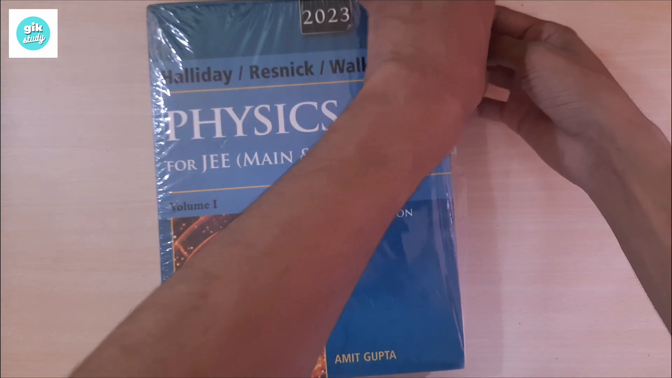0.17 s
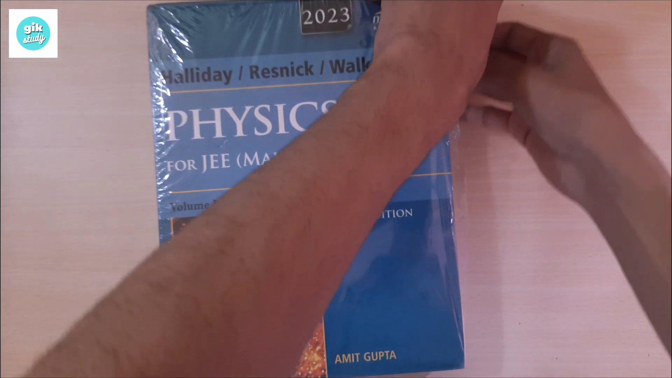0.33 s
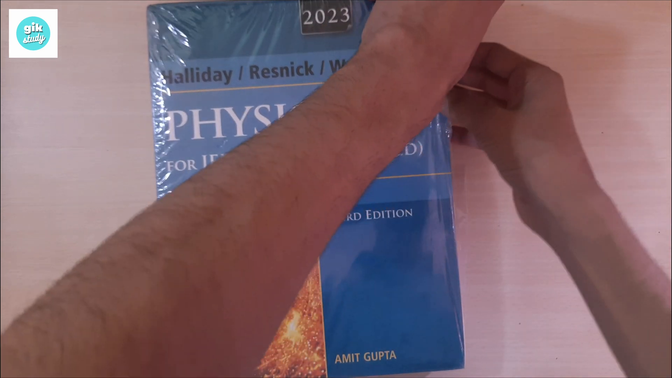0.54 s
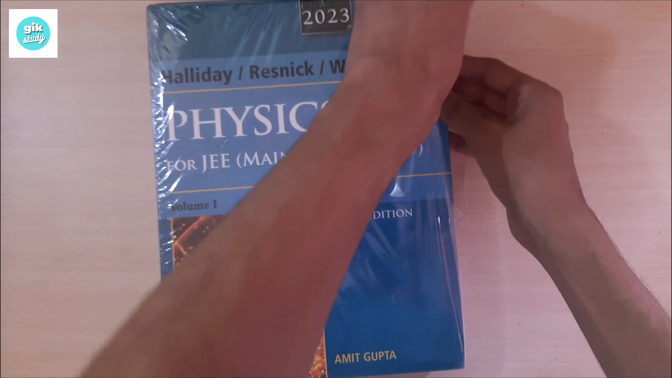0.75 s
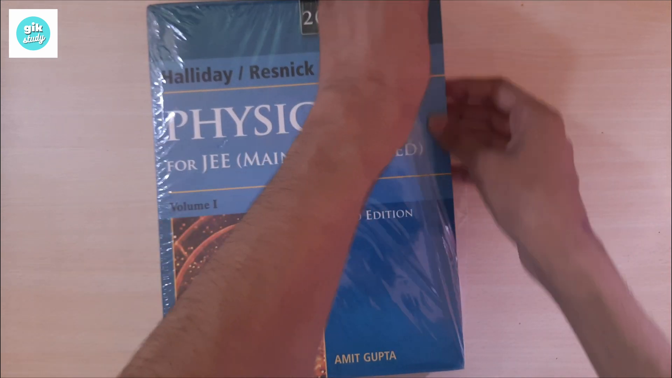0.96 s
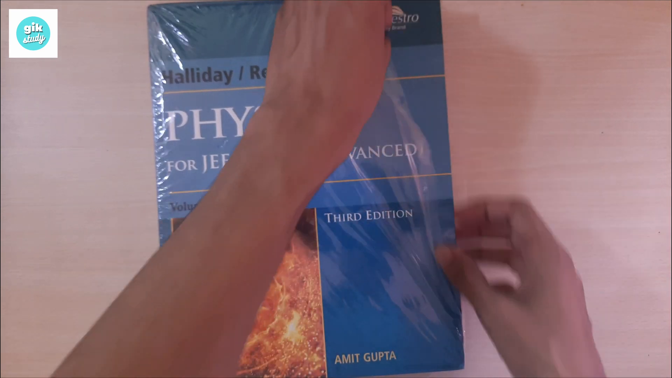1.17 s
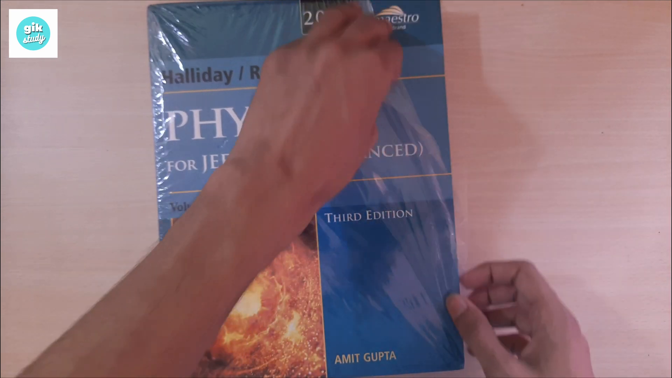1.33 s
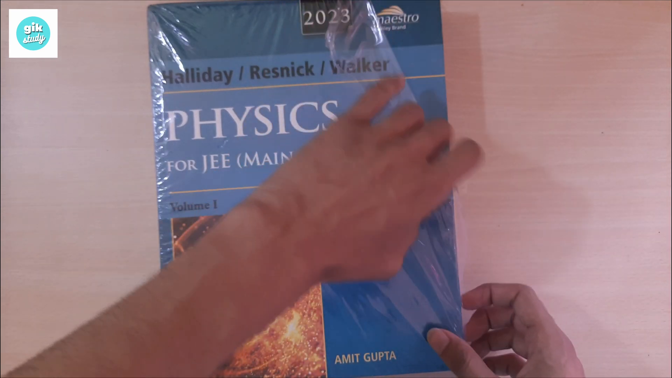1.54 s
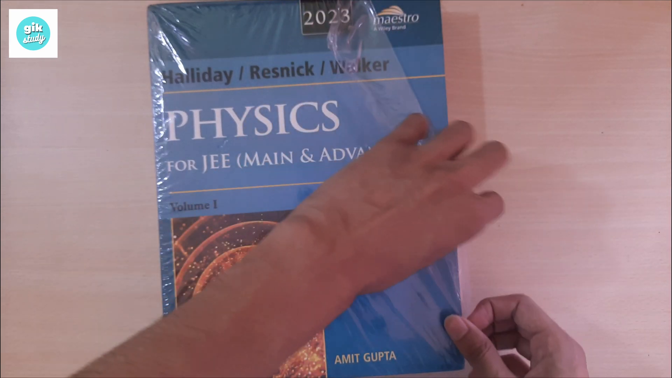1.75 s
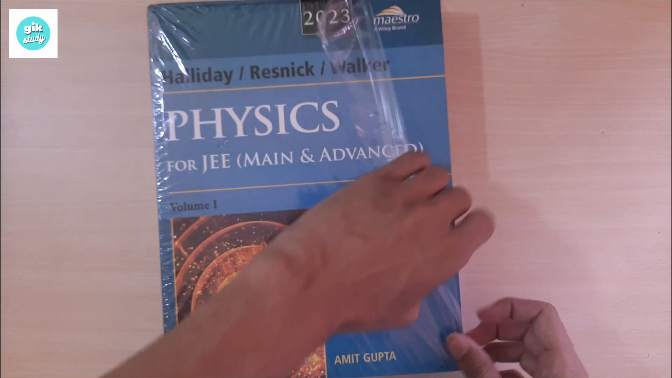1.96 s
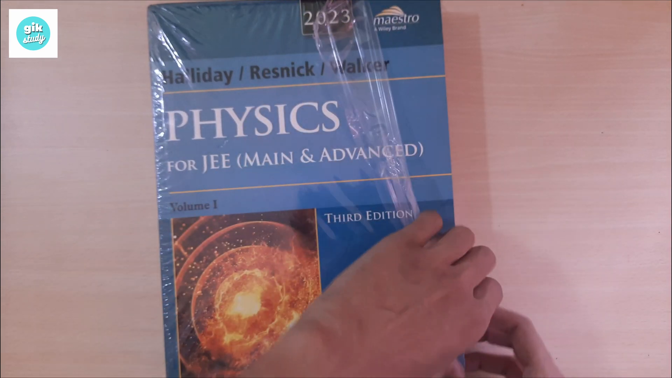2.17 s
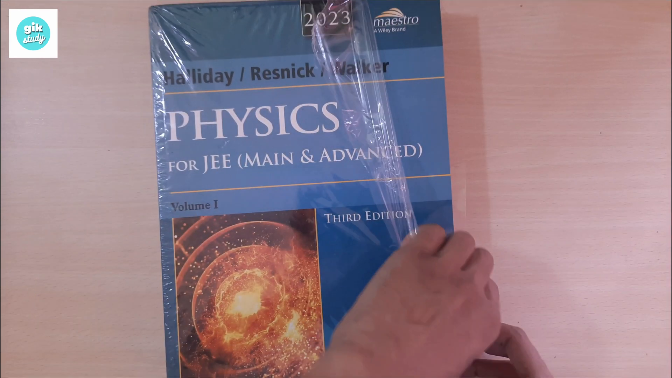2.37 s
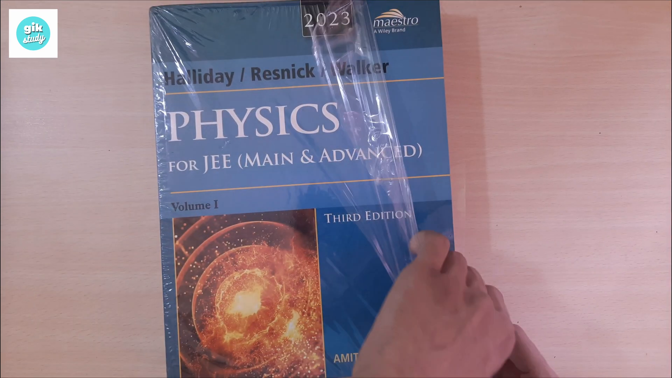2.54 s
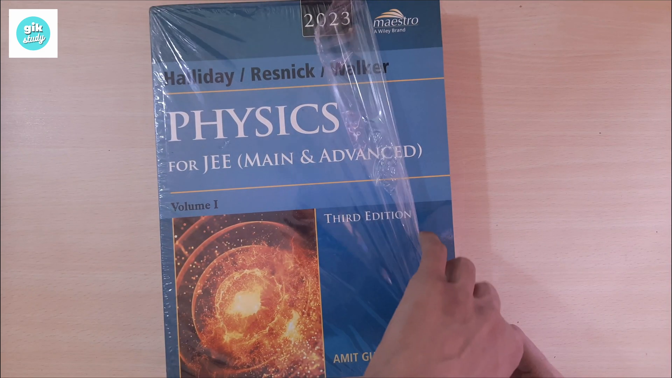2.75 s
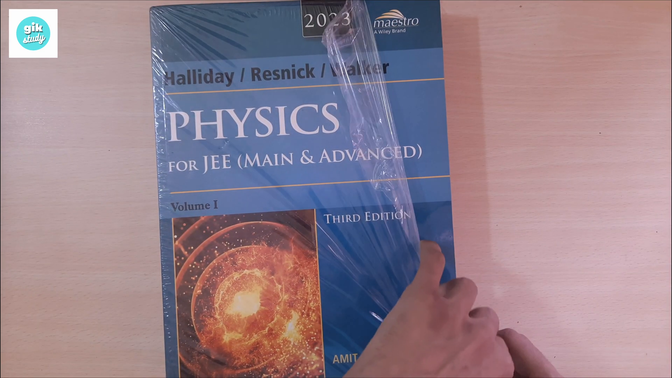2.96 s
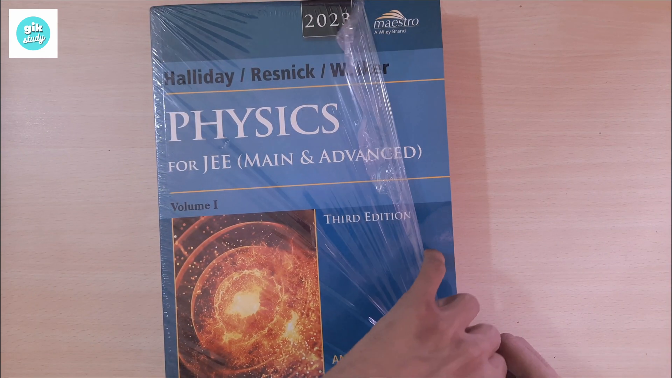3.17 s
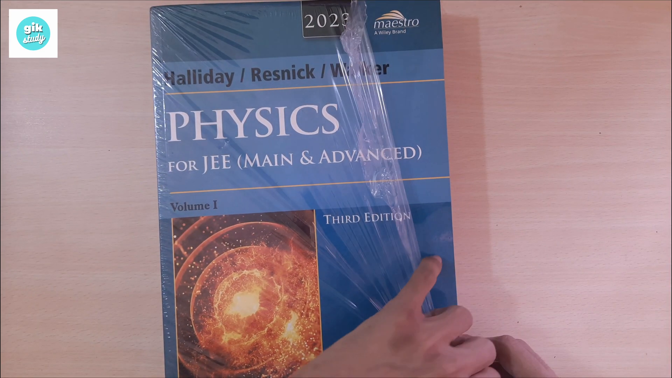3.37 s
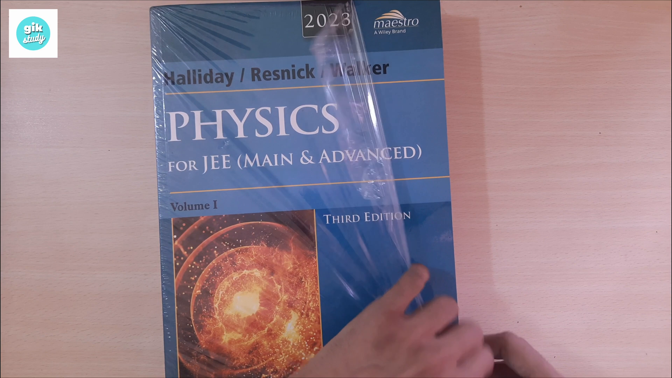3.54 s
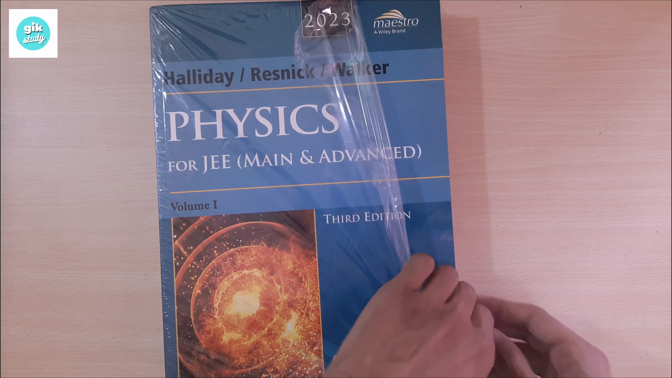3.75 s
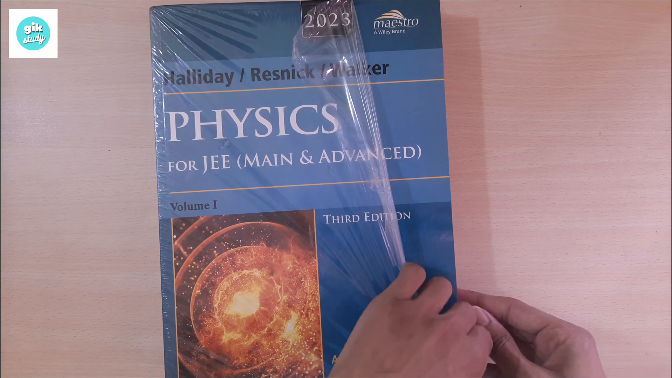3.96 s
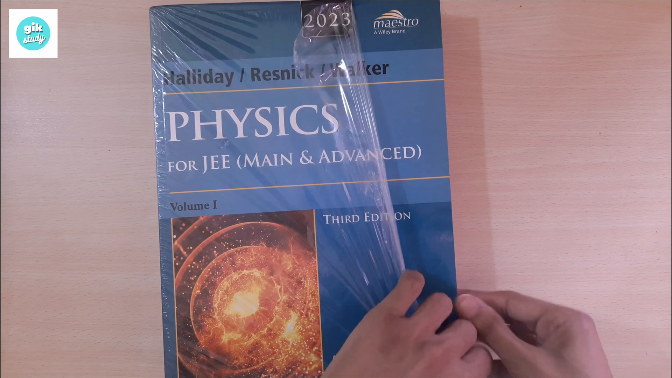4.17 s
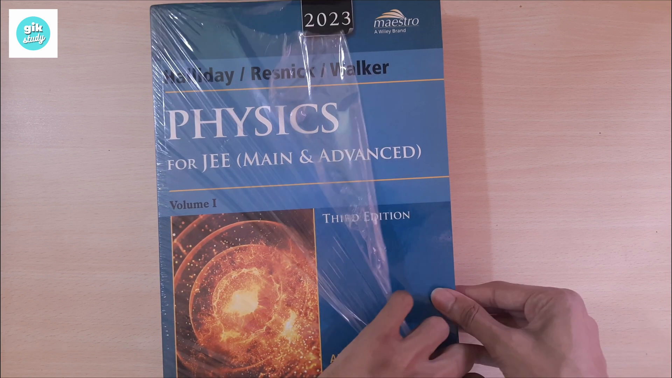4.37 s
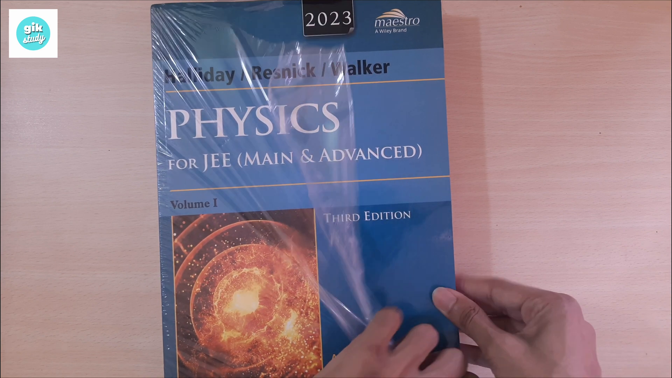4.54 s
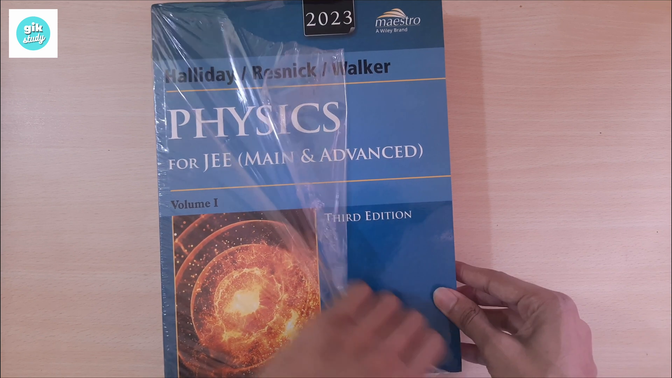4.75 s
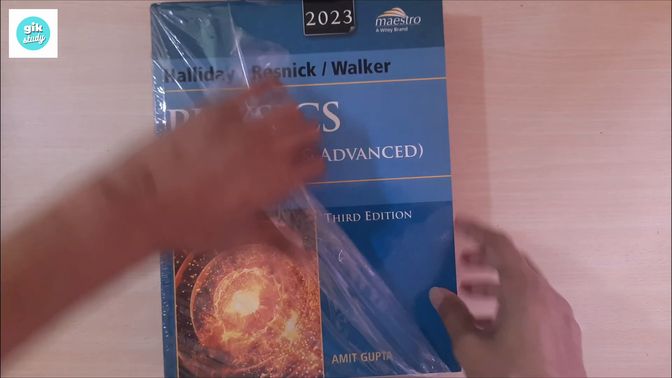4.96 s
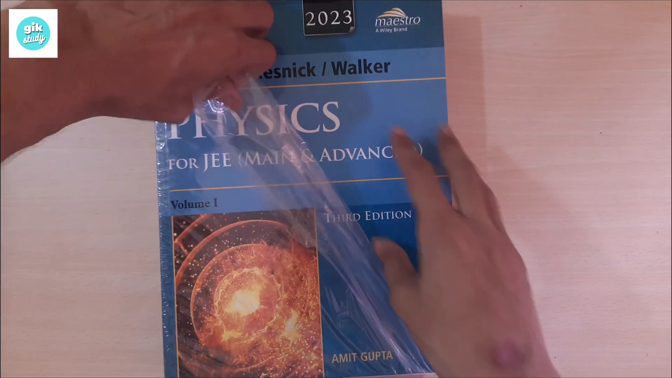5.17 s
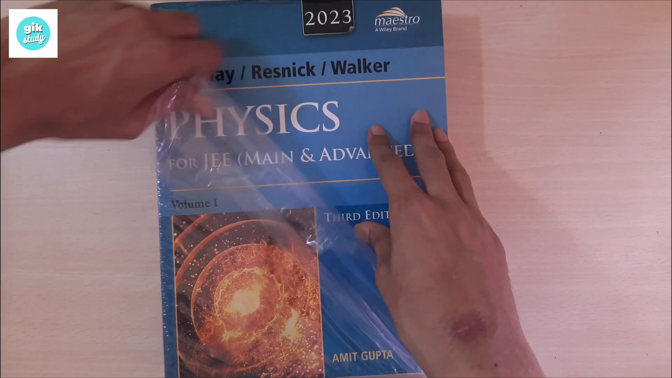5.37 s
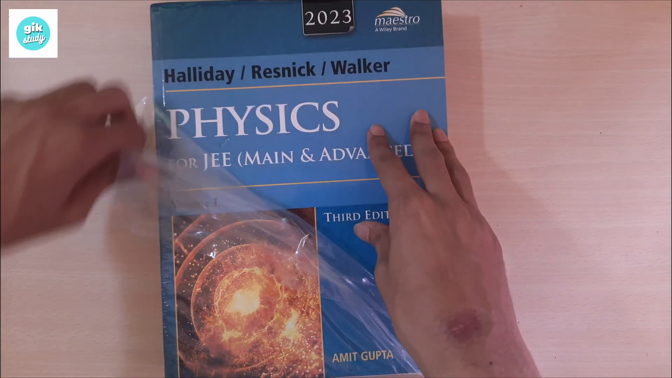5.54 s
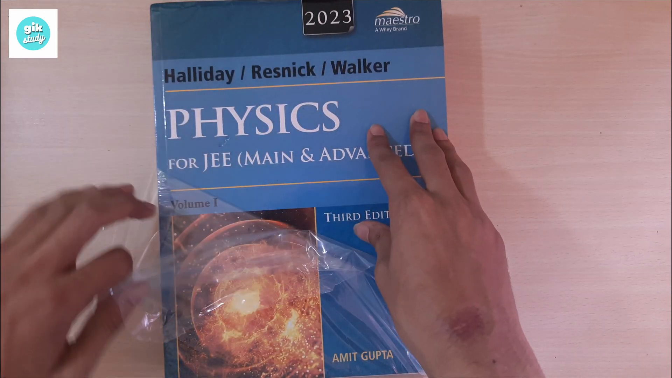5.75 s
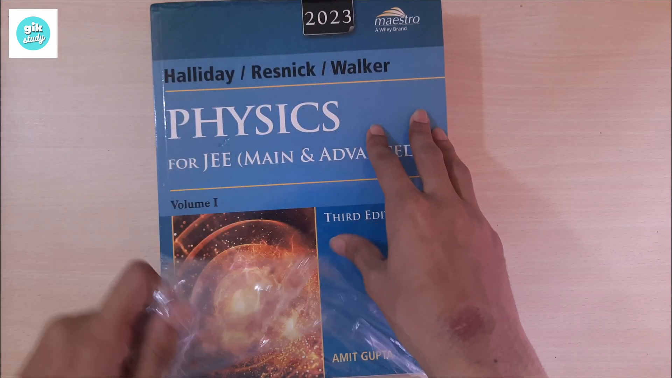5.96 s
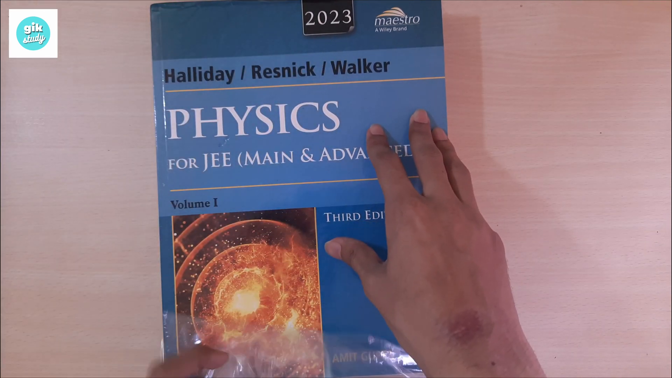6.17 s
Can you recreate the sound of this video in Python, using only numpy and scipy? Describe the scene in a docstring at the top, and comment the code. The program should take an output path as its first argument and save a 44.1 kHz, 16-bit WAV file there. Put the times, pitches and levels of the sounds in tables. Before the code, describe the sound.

Thin plastic film crackles and tears under hands close by, snaps loudly once when stretched taut, then rustles and billows loosely in a small room.

```python
"""Peeling shrink wrap off a book

Film is pulled off a book in a small bare room, close to a stereo microphone, with faint birds outside.
Clouds of tiny creases ring damped patches of film, single folds snap, and the loose sheet thrums.
Stretched taut, the film bursts with one loud crack made of short ringing modes. Tears are avalanches
of clicks. The path to the right microphone grows as the film is dragged off to the left."""
import sys
import numpy as np
from scipy import signal
from scipy.io import wavfile
from scipy.ndimage import uniform_filter1d, map_coordinates

SR = 44100
rng = np.random.default_rng(int(sys.argv[2]) if len(sys.argv) > 2 else 0)


def digitize_waveform(pressure):
    """Quantize a signal to 16-bit integers and store it at the path in sys.argv[1].

    Rows of a 2-D input are taken as channels; values are limited to [-1, 1].
    """
    field = np.atleast_2d(pressure).T
    bounded = np.clip(field, -1, 1)
    quanta = np.round(bounded * 32767).astype(np.int16)
    wavfile.write(sys.argv[1], SR, quanta)


N = 273816
TIME = np.arange(N) / SR


def amp(db):
    """Turns decibels into a gain."""
    return 10 ** (np.asarray(db) / 20)


def evened(x):
    """Scales a sound to an rms of 1."""
    return x / np.sqrt(np.mean(x ** 2) + 1e-20)


def read(points, hz):
    """Reads a spectrum between its points, on a log-frequency axis."""
    f, value = np.transpose(points)
    return np.interp(np.log(hz + 1), np.log(f + 1), value)


def curve(points):
    """Joins (t/s, value) points by straight lines."""
    return np.interp(TIME, *np.transpose(points))


def add(mix, s, sound):
    """Mixes a sound in at time s, leaving out what falls outside the scene."""
    start = round(s * SR)
    part = mix[:, max(start, 0):max(start + sound.shape[-1], 0)]
    part += sound[..., max(-start, 0):][..., :part.shape[-1]]


def sides(db):
    """Gains of the two channels for a left-right difference."""
    return amp([[db / 2], [-db / 2]])


def coloured(x, points, size=2048):
    """Causal filter with the given spectrum, so that attacks stay sharp."""
    log_gain = np.log(amp(read(points, abs(np.fft.fftfreq(size, 1 / SR)))))
    minimum_phase = np.exp(np.conj(signal.hilbert(log_gain)))
    taps = np.fft.ifft(minimum_phase).real
    return signal.oaconvolve(x, taps[None], axes=1)[:, :x.shape[1]]


def ring(x, hz, q):
    """A patch that rings: one damped resonance, sharper for a larger q."""
    return signal.lfilter(*signal.iirpeak(min(hz, SR / 3), max(q, hz / SR * 5), SR), x)


# colour of the still air: f/Hz, level/dB (per Hz)
FLOOR = [(30, -30), (270, -5.5), (600, -15.5), (1330, -21), (7080, -19.5), (9190, -30.5), (15500, -40)]
FLOOR_DB = -69


def background(hum_hz=468, hum_db=-77, hum_end_s=1.7):
    """Still air in the room is coloured noise; a faint far hum is noise in a narrow band that fades away."""
    air = evened(coloured(rng.standard_normal(N) + 1.6 * rng.standard_normal((2, N)), FLOOR))
    hum = evened(ring(ring(rng.standard_normal(N), hum_hz, 50), hum_hz, 50))
    fade = np.clip((hum_end_s - TIME) / .5, 0, 1)
    return amp(FLOOR_DB) * air + amp(hum_db) * hum * fade


# bird whistles: start t/s, length/s, first f/Hz, middle f/Hz, last f/Hz, relative level/dB
BIRDS = [(-.06, .24, 7650, 7300, 6650, -62), (.41, .25, 1400, 1565, 1530, -64),
         (2.27, .25, 1480, 1570, 1530, -56), (2.63, .2, 7450, 7300, 6750, -56)]


def birds(waver_hz=28, flutter_db=4.5):
    """Thin far whistles, some high and falling, some low and arched, waver in pitch and strength."""
    out = np.zeros((2, N))
    for s, length, first, middle, last, db in BIRDS:
        u = np.linspace(0, 1, round(length * SR))  # progress through the whistle
        hz = np.polyval(np.polyfit([0, .5, 1], [first, middle, last], 2), u)
        hz = hz + waver_hz * evened(uniform_filter1d(rng.standard_normal(len(u)), size=400))
        flutter = np.interp(u, np.linspace(0, 1, 20), np.tanh(2 * rng.standard_normal(20)))
        whistle = np.sin(2 * np.pi * np.cumsum(hz) / SR)
        add(out, s, amp(db + flutter_db * flutter) * whistle * np.sin(np.pi * u))
    return out


GRIP_S, RELAX_S = 0.032, 0.029  # a move takes hold, then dies away once the hand eases


def stroke(s, length, db, growth_db):
    """One move of a hand: it takes hold, grows or eases steadily, and lets go."""
    t = TIME - s
    held = amp(db + growth_db * np.clip(t / length, 0, 1))
    grip = np.sin(np.pi / 2 * np.clip(t / GRIP_S, 0, 1)) ** 2
    return held * grip * np.exp(-np.maximum(t - length, 0) / RELAX_S)


# colour of the shaken book: f/Hz, level/dB (per Hz)
BOOK = [(25, -32), (65, -11.5), (110, 4), (170, -7), (500, -36)]
# the palm drags across the cover: start t/s, length/s, level/dB, growth over the move/dB
RUBS = [(1.063, 0.13, -53, -10), (1.625, 0.25, -61.5, 7.5), (1.99, 0.37, -55.5, -18)]


def palm(bumps_per_s=90):
    """Skin judders over the cover and shakes the heavy book: random bumps with a low colour."""
    bumps = rng.standard_normal((1, N)) * (rng.random(N) < bumps_per_s / SR)
    return sum(stroke(*rub) for rub in RUBS) * evened(coloured(bumps, BOOK))


# the sheet billows with a hollow note: fullest at t/s, swell/s, level/dB, f/Hz
BILLOWS = [(0.189, 0.0055, -54.5, 305), (1.399, 0.012, -50, 350), (2.018, .011, -50, 200),
           (2.127, 0.0055, -45.5, 283), (2.32, 0.0085, -48.5, 595), (2.67, 0.044, -51, 560),
           (3.735, 0.023, -53, 770), (3.925, 0.009, -45.5, 480), (5.587, 0.034, -28.5, 345),
           (5.996, 0.03, -32.5, 820)]


def billows(q=1.0, flaps_per_s=1500, stray=0.19):
    """Air swells under the loose sheet and leaves it again; the flutter rings one wide patch of film."""
    out = np.zeros((2, N))
    shared, side = rng.standard_normal((2, N)) * (rng.random(N) < flaps_per_s / SR)
    flaps = np.array([shared + stray * side, shared - stray * side])
    for s, swell, db, hz in BILLOWS:
        near = abs(TIME - s) < 4 * swell
        flutter = evened(ring(ring(flaps[:, near], hz, q), hz, q))
        out[:, near] += amp(db) * flutter * np.exp(-.5 * ((TIME[near] - s) / swell) ** 2)
    return out


# film slides over the cover: start t/s, length/s, level/dB, growth over the slide/dB, f/Hz
SLIDES = [(0.766, 0.14, -63.5, 7, 3730), (2.935, .11, -56, -6, 3880), (3.589, .09, -62.5, 14, 3150)]


def slides(q=1.9, catches_per_s=1500):
    """Taut film slides over the cover in tiny catches that ring one narrow, bright patch."""
    out = np.zeros((2, N))
    shared, left, right = rng.standard_normal((3, N)) * (rng.random(N) < catches_per_s / SR)
    catches = shared + np.array([left, right])
    for s, length, db, growth_db, hz in SLIDES:
        out += stroke(s, length, db, growth_db) * evened(ring(ring(catches, hz, q), hz, q))
    return out


# pulls of the hands: start t/s, length/s, strength level/dB, growth over the pull/dB, slack of the film/dB
PULLS = [(-.03, 0.11, -63.5, -3, -3), (0.28, 0.1, -56.5, 3.5, -5), (0.448, 0.074, -51.5, -5, -5),
         (0.535, 0.16, -62.5, 5.5, -17), (0.834, 0.089, -57, 8, -11.5), (1.048, 0.11, -39, 0, -3.5),
         (1.212, 0.055, -40.5, 3, -4.5), (1.288, 0.35, -45.5, -1.5, -9), (1.671, 0.22, -52, 6.5, -3.5),
         (1.984, 0.27, -47.5, 0, -3.5), (2.242, 0.062, -46.5, 4, -8), (2.34, 0.18, -63.5, 14.5, -5),
         (2.563, 0.12, -43, -19, -2), (2.764, 0.13, -45, -8.5, -11), (2.933, 0.19, -64, -2, -22),
         (3.629, 0.12, -49, -0.5, -16), (3.841, 0.088, -47, -7, -6.5), (3.988, 0.087, -40, 2, -15.5),
         (4.493, 0.17, -59.5, 11.5, -6), (4.695, 0.33, -40.5, -3.5, -10), (4.944, 0.13, -37, 4.5, -7.5),
         (5.104, 0.1, -36, -3, -7.5), (5.288, 0.22, -36.5, 2, -3.5), (5.541, 0.32, -38.5, -6, -1.5),
         (5.886, 0.23, -35.5, 2, -5.5), (6.151, .1, -44.5, -3.5, -3)]


def effort(per_slack=0):
    """All pulls together, as a gain; per_slack says how much a sound needs loose film."""
    power = sum(stroke(s, length, db + per_slack * slack_db, growth_db) ** 2
                for s, length, db, growth_db, slack_db in PULLS)
    return np.sqrt(power)


def creases(per_s, spread_db, colour, low_hz, high_hz, stray, roam_db=2.6, count=20):
    """A cloud of buckling creases, mostly small; each patch has its own pitch and radiates unevenly."""
    out, steps = np.zeros((2, N)), np.arange(0, N / SR, 1 / 20)
    for hz in np.geomspace(low_hz, high_hz, count):
        # the strain roams from patch to patch
        strain_db = roam_db * np.interp(TIME, steps, rng.standard_normal(len(steps)))
        size_db = strain_db + spread_db * np.minimum(rng.exponential(1, N), 3.6)
        clicks = amp(size_db) * (rng.random(N) < per_s / count / SR) * rng.choice([-1, 1], N)
        side = stray * np.roll(clicks * rng.standard_normal(N), rng.integers(0, 4))
        out += ring(np.array([clicks + side, clicks - side]), hz, 2.6) / np.sqrt(hz)
    return evened(coloured(out, colour))


# colour of the small creases: f/Hz, level/dB (per Hz)
CRACKLE = [(200, -21), (700, -10.5), (1500, -7), (2500, -1), (4000, -2), (5500, -5), (7200, -3.5),
           (9000, -18), (12000, -15.5), (16000, -24.5)]
# colour of the wide folds: f/Hz, level/dB (per Hz)
RUSTLE = [(100, -33.5), (300, -6), (550, -7.5), (900, 0), (1400, 1.5), (2500, -6), (6000, -43.5)]
# colour of the loose, shaking sheet: f/Hz, level/dB (per Hz)
THRUM = [(25, -43), (60, -30), (120, -12), (200, -5), (330, 3.5), (550, -1), (850, -5), (2500, -56.5)]
THRUM_PER_SLACK = 2.3  # dB of thrum for each dB of slack: taut film crackles, loose film rustles and shakes


def handling(crackle_db=-1, rustle_db=-1.5, thrum_db=-3, slips_per_s=70, slip_s=0.0088, slip_size=1.97):
    """The pulled film sticks and slips: small creases crackle, wide folds rustle, the loose sheet thrums."""
    jerks = (rng.random(N) < slips_per_s / SR) * rng.random(N)
    # each slip starts at once and dies away
    decaying = signal.lfilter([1], [1, -np.exp(-1 / (slip_s * SR))], jerks)
    slips = evened(1 + slip_size * decaying)
    crackle = creases(2200, 2.46, CRACKLE, 1225, 13000, stray=0.92) * sides(-0.47)
    rustle = creases(1100, 4.0, RUSTLE, 309, 1620, stray=0.38)
    thrum = creases(700, 2.6, THRUM, 44, 787, stray=0.324)
    small = effort() * slips * amp(crackle_db) * crackle
    wide = effort(1) * slips * amp(rustle_db) * rustle
    sheet = effort(THRUM_PER_SLACK) * amp(thrum_db) * thrum
    return small + wide + sheet


# bright colour of snaps and tears: f/Hz, level/dB
BRIGHT = [(30, -28), (250, 6.5), (4000, 1.5), (7200, -1), (9000, -11.5), (12000, -4), (16000, -18)]
# folds that snap: t/s (before a small shared delay), relative level/dB, f/Hz
SNAPS = [(0.298, -35.5, 6520), (0.476, -38, 3300), (0.88, -28, 1720), (1.066, -14, 1800),
         (1.078, -19.5, 3400), (1.115, -19, 2500), (1.155, -23, 2000), (1.239, -18, 2130),
         (1.498, -21.5, 2630), (1.51, -25, 6440), (1.554, -29.5, 4500), (1.63, -25, 2440),
         (1.778, -23.5, 2310), (1.848, -23, 1120), (2.122, -27, 3020), (2.278, -23.5, 4100),
         (2.29, -25.5, 2550), (2.481, -27.5, 1510), (2.523, -34, 1600), (2.638, -29, 1610),
         (2.698, -25.5, 2770), (2.758, -29.5, 2000), (2.794, -34, 3460), (2.815, -31, 3420),
         (2.856, -29.5, 5140), (2.986, -36.5, 4220), (3.014, -37, 4060), (3.102, -38.5, 3560),
         (3.144, -44, 3120), (3.322, -47, 6000), (3.345, -48, 4160), (3.463, -48, 6500), (3.715, -24, 5400),
         (3.858, -32.5, 4500), (3.882, -24.5, 1730), (3.945, -22, 1740), (3.953, -26, 2540),
         (4.414, -9, 2700), (4.434, -11.5, 2080), (4.564, -24.5, 1680), (4.638, -23.5, 3200),
         (4.763, -19, 3500), (4.795, -29, 2510), (4.831, -27.5, 1410), (4.992, -18.5, 2660),
         (5.131, -23.5, 4090), (5.377, -21.5, 1400), (5.451, -9, 1680), (5.578, -12.5, 3630),
         (5.623, -13, 3170), (6.034, -13.5, 3950), (6.045, -20, 4400), (6.123, -22.5, 1100)]


def snaps(snap_db=0.5, q=0.98, tick=0.1, scatter=0.16, scatter_s=0.0027, pan_db=-2.0, size=2048):
    """A fold flips over: one push rings its patch and nearby creases follow; small patches tick more sharply."""
    out, t = np.zeros((2, N)), np.arange(size) / SR
    for s, db, hz in SNAPS:
        push = (t == 0) + scatter * rng.standard_normal((2, size)) * np.exp(-t / scatter_s)
        snap = coloured(ring(ring(push, hz, q), hz, q) + tick * hz / 2500 * push, BRIGHT)
        snap = snap / abs(snap).max()
        add(out, s + 0.001497, amp(db + snap_db) * snap * sides(pan_db))
    return out


# runs of tearing: fullest at t/s, rise/s, fall/s, relative level/dB, f/Hz, relative level of the thump/dB
RIPS = [(0.066, 0.0076, 0.0055, -45.5, 1870, -62.5), (1.066, .0014, 0.03, -30.5, 1870, -43),
        (1.851, 0.0012, 0.0043, -28.5, 1300, -46.5), (2.64, .001, 0.0022, -25, 2040, -56.5),
        (4.017, 0.0019, 0.0054, -25.5, 1760, -48.5), (4.293, .0004, 0.0024, -30, 2540, -58.5),
        (4.415, .005, 0.0099, -20.5, 2280, -44), (5.453, 0.001, 0.007, -19, 1760, -41.5)]


def rips(per_s=5000, q=0.45, tick=0.06, thump_s=0.015):
    """A tear runs through the film: an avalanche of clicks swells and dies, and the freed sheet thumps."""
    out = np.zeros((2, N))
    for s, rise, fall, db, hz, thump_db in RIPS:
        t = np.arange(-2.5 * rise, 5 * max(fall, thump_s), 1 / SR)
        shared, left, right = rng.standard_normal((3, len(t))) * (rng.random(len(t)) < per_s / SR)
        clicks = shared + np.array([left, right])
        tear = evened(coloured(ring(ring(clicks, hz, q), hz, q) + tick * clicks, BRIGHT))
        tear = tear * np.exp(np.minimum(t / rise, -t / fall))
        thump = coloured(shared[None] * np.exp(np.minimum(t / rise, -t / thump_s)), THRUM)
        add(out, s + t[0], amp(db) * tear * sides(-1.6) + amp(thump_db) * evened(thump))
    return out


CRACK_S, CRACK_DB = 4.0193, 3.5  # start, and gain on all modes
# ringing modes of the bursting film: f/Hz, relative level/dB, t60/s (time to fall by 60 dB), left-right/dB
CRACK = [(1750, -2, 0.007, 0.5), (2690, -5.5, 0.0049, -9), (3230, -11.5, 0.007, 9.5),
         (4820, -5, 0.0066, 6.5), (6600, -17, 0.0029, -3.5), (11900, -11.5, 0.0027, 10)]


def crack(lead_ms=0.049, rise_s=0.0002, size=2048):
    """The taut film lets go and rings for a few milliseconds; its waves run lead_ms ahead on the right."""
    t = np.arange(size) / SR
    ports = np.array([t, t + lead_ms / 1000])
    burst = np.zeros((2, size))
    for hz, db, t60, pan_db in CRACK:
        burst += amp(db - 60 * t / t60) * np.cos(2 * np.pi * hz * ports) * sides(pan_db)
    colour = [(100, -21.0), (1200, -0.5), (6000, 2.0), (9000, 1.0), (12000, -12.5), (16000, -23.0)]
    out = np.zeros((2, N))
    add(out, CRACK_S, amp(CRACK_DB) * coloured(burst * (1 - np.exp(-t / rise_s)), colour))
    return out


# lag of the right microphone as the film moves left: t/s, delay/ms
DELAY = [(4.6, 0.032), (5.5, .22)]


def placed(x):
    """The path to the right microphone grows as the film is carried left."""
    late = curve(DELAY) * SR / 1000  # in samples
    right = map_coordinates(x[1], [np.arange(N) - late], order=3, mode="nearest")
    return np.array([x[0], right])


# decay of the room: f/Hz, t60/s
ROOM = [(200, .45), (500, .32), (1000, .25), (1800, .31), (5000, .25), (10000, .24)]
# standing waves: f/Hz, relative level/dB
STANDING = [(189, -19), (281, 3), (348, -2), (404, 6), (462, 5.5), (521, -5)]
# first echoes: nominal delay t/s, relative level/dB
ECHOES = [(.0012, -12), (0.0117, -11.5)]


def room(x, tail_db, echo_db, standing_db=-55, standing_t60=0.21, build_s=0.0069, mono_hz=450):
    """Echoes from desk and walls, standing waves, and a diffuse tail whose bass is alike on both sides."""
    t = np.arange(SR * 2 // 3) / SR
    taps = rng.standard_normal((2, len(t))) * (rng.random((2, len(t))) < .2)
    taps = taps * (1 - np.exp(-(t / build_s) ** 2))
    hz, when, z = signal.stft(taps, SR, nperseg=256)
    same = 1 / (1 + (hz[:, None] / mono_hz) ** 2)  # likeness of the two sides
    z = np.array([z[0], same * z[0] + np.sqrt(1 - same ** 2) * z[1]])
    z = z * amp(-60 * when / read(ROOM, hz)[:, None])  # each pitch decays at its own rate
    tail = signal.istft(z, SR, nperseg=256)[1][:, :len(t)]
    response = amp(tail_db) * tail / np.linalg.norm(tail[0])
    standing_decay = np.exp(-np.log(1000) * t / standing_t60)
    for wave_hz, db in STANDING:
        wave = np.sin(2 * np.pi * (wave_hz * t + rng.random()))
        response += amp(tail_db + standing_db + db) * wave * standing_decay
    for s, db in ECHOES:
        for channel in range(2):
            response[channel, round(s * rng.uniform(.95, 1.05) * SR)] += amp(db + echo_db)
    return x + signal.fftconvolve(x, response, axes=1)[:, :N]


def scene():
    """Film, book and far birds sound in the same small room."""
    outside = amp(-2.5) * room(birds(), tail_db=0.5, echo_db=10.5)
    film = room(placed(handling() + slides() + billows()) + palm(), tail_db=-4, echo_db=-9)
    folds = room(placed(snaps()), tail_db=-8.5, echo_db=-3.5)
    tears = room(placed(rips()), tail_db=-3.5, echo_db=-4.5)
    burst = room(crack(), tail_db=-9.0, echo_db=1.0)
    return background() + outside + film + folds + tears + burst


EDGE_HZ = 16000  # upper band limit


def record(dry):
    """The microphone cuts the deepest bass, its input clips at full scale, and the band limit follows."""
    cut = signal.sosfilt(signal.butter(3, 48, "highpass", fs=SR, output="sos"), dry)
    band = signal.firwin(511, EDGE_HZ, window=("kaiser", 9), fs=SR)
    return signal.oaconvolve(np.clip(cut, -1, 1), band[None], "same")


dry = scene()
out = record(dry)
digitize_waveform(out)
```